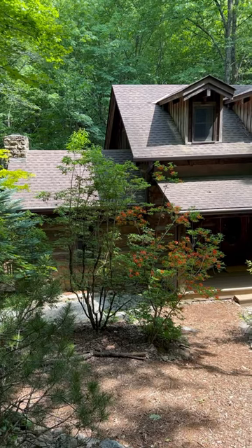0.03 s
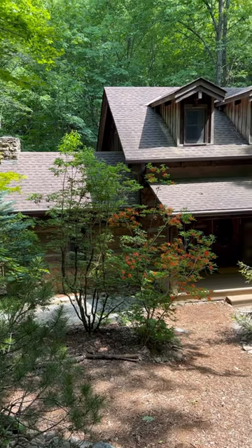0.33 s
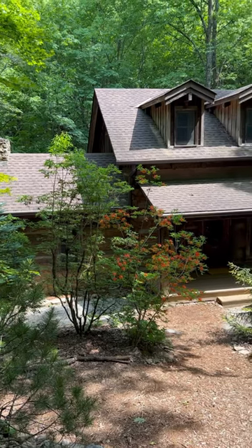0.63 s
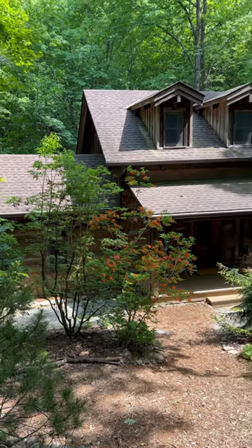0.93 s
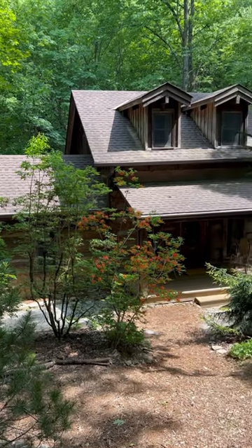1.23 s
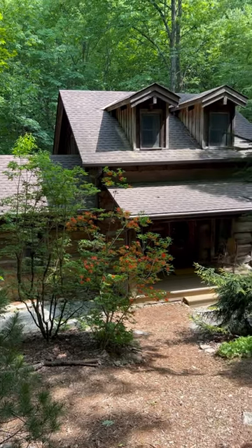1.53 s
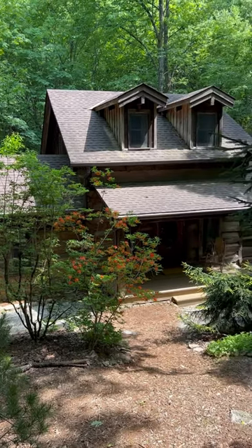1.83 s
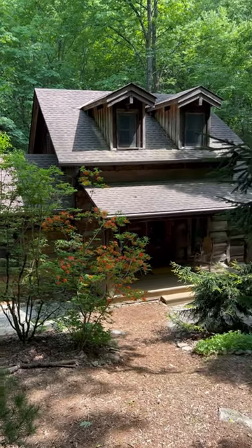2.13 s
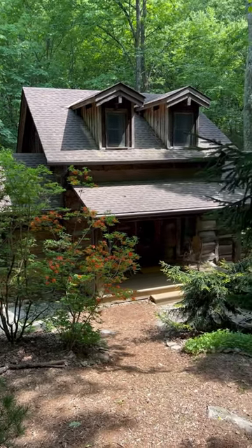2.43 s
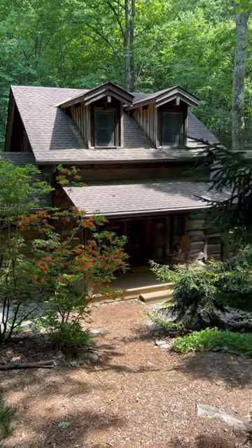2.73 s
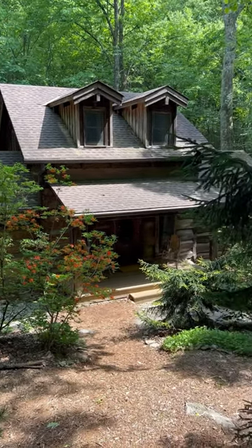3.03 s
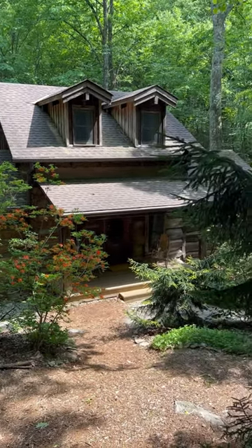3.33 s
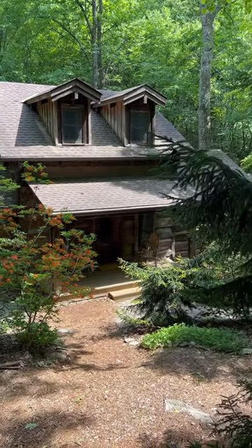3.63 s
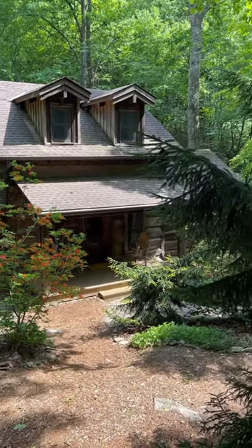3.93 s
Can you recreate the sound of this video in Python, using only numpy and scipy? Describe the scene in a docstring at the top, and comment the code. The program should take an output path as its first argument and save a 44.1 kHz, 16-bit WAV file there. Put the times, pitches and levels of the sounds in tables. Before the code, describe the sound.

Far-off running water fills a wooded clearing with a soft, even rush throughout. A bird gives a few faint, high chirps in the trees, while small gusts bump the microphone with low thuds through the middle and later part.

```python
"""A steady, wide hiss fills a forest clearing by a cabin, most likely a creek beyond the trees:
countless far splashes merging into one rush. Close up, light puffs of air thud and rumble on
the two-port microphone. Far off, a few short bird chirps barely rise out of the hiss."""
import sys
import numpy as np
from scipy import signal
from scipy.fft import rfft, irfft, next_fast_len
from scipy.io import wavfile
from scipy.ndimage import uniform_filter1d, map_coordinates

SR = 44100
rng = np.random.default_rng(int(sys.argv[2]) if len(sys.argv) > 2 else 0)


def file_out(sig):
    """Save sig as 16-bit WAV at sys.argv[1]."""
    # one column per channel
    cols = np.atleast_2d(sig).T
    # limit, then scale
    lim = np.clip(cols, -1, 1)
    pcm = np.round(lim * 32767).astype(np.int16)
    wavfile.write(sys.argv[1], SR, pcm)


N = 176400
TIME_S = np.arange(N) / SR


def amp(db):
    """Decibels to gain."""
    return 10 ** (np.asarray(db) / 20)


def unit_rms(x):
    """Scale to rms 1."""
    return x / np.sqrt(np.mean(x ** 2) + 1e-20)


def curve_at(table, hz, column=1):
    """One column of a table, interpolated on a log frequency axis."""
    columns = np.transpose(table)
    return np.interp(np.log(hz + 1), np.log(columns[0] + 1), columns[column])


def wobble(rate_hz):
    """A smooth random curve with rate_hz knots a second."""
    knots = rng.standard_normal(int(N * rate_hz / SR) + 4)
    return map_coordinates(knots, [TIME_S * rate_hz])


def filtered(x, response):
    """Multiply the spectrum of x by response(hz)."""
    size = next_fast_len(N + SR // 2)
    hz = np.fft.rfftfreq(size, 1 / SR)
    return irfft(rfft(x, size) * response(hz), size)[..., :N]


def bell(peak_s, length_s):
    """A bell-shaped rise and fall around peak_s."""
    return np.exp(-2 * ((TIME_S - peak_s) / length_s) ** 2)


# Bird chirps far off in the trees: peak_s, length_s, pitch_hz, blur_hz, level_db
BIRD_CHIRPS = [(.533, 0.044, 4330, 650, -59), (1.9, 0.033, 3570, 300, -57), (2.934, .021, 3830, 74.6, -53),
               (3.87, .035, 4600, 200, -68)]

def far_bird(rise_hz_per_s=600):
    """Short, slightly rising notes, some thin, some smeared on their way through the trees."""
    chirps = np.zeros(N)
    for peak_s, length_s, pitch_hz, blur_hz, level_db in BIRD_CHIRPS:
        glide_hz = pitch_hz + rise_hz_per_s * np.clip(TIME_S - peak_s, -length_s, length_s)
        phase = 2 * np.pi * np.cumsum(glide_hz) / SR
        note = wobble(2 * blur_hz) * np.sin(phase) + wobble(2 * blur_hz) * np.cos(phase)
        chirps += amp(level_db) * bell(peak_s, length_s) * unit_rms(note)
    return chirps


# Puffs of air right on the microphone: peak_s, length_s, pitch_hz, level_db
AIR_PUFFS = [(1.114, 0.016, 75.4, -44), (1.459, 0.024, 60, -42), (1.492, 0.023, 58, -44),
             (1.731, 0.017, 68, -42), (1.77, .022, 88.2, -34.5), (1.866, .03, 68.2, -41),
             (1.899, .017, 68, -37.5), (1.931, .018, 70, -45.5), (2.086, 0.069, 57.8, -49),
             (2.684, 0.029, 61.6, -48), (2.762, .05, 60, -51), (2.815, 0.022, 62, -41),
             (3.067, 0.016, 76, -41), (3.116, 0.022, 91, -42), (3.157, 0.021, 78.4, -39.5),
             (3.187, .028, 62.1, -44.5), (3.355, 0.053, 52, -53)]
# Spectrum of their turbulence: frequency_hz, relative_db
RUMBLE_SPECTRUM = [(20, -9), (40, 6), (62, 0.5), (90, -7.5), (130, -1.5), (200, -9.5), (330, -11.5),
                   (500, -26), (1000, -100)]

def air_on_microphone(sag_octaves=0.45, rumble_db=-7.5, side_db=-24):
    """Each eddy thuds on the microphone: a few low swings that slow down, roughened by turbulence."""
    thuds, strength = np.zeros(N), np.zeros(N)
    for peak_s, length_s, pitch_hz, level_db in AIR_PUFFS:
        progress = np.clip((TIME_S - peak_s) / length_s, -1, 1)
        falling_hz = pitch_hz * 2 ** (-sag_octaves * progress)
        phase = 2 * np.pi * (np.cumsum(falling_hz) / SR + rng.random())
        eddy = amp(level_db) * bell(peak_s, length_s)
        thuds += eddy * np.sqrt(2) * np.sin(phase)
        strength += eddy
    noise = rng.standard_normal((2, N))
    mid, side = unit_rms(filtered(noise, lambda hz: amp(curve_at(RUMBLE_SPECTRUM, hz))))
    side = amp(side_db) * side  # the small part that differs between the ports
    turbulence = np.array([mid + side, mid - side])
    return thuds + amp(rumble_db) * strength * turbulence


# Coherence of the microphone's two ports: frequency_hz, in_phase_part, quadrature_part
PORT_COHERENCE = [(100,0.99,0.012),(366,0.93,-0.16),(750,0.22,0.049),(1310,0.28,0.33),(1720,0.67,0.49),(2190,0,0.25),(2800,-0.31,0.056),(3440,0.0057,-0.063),(4080,0.44,-.26),(4930,-0.21,-0.35),(5560,0.93,0.071),(7360,1,-.02),(8430,0.72,-.5),(10000,0.012,-.52),(12570,-1.13,-0.012)]
# Balance between the ports: frequency_hz, left_minus_right_db
PORT_BALANCE = [(130,-0.5),(270,-1),(570,-4),(1220,-2),(2580,0.3),(5480,0)]

def at_microphone(noise_pair):
    """Mix two unrelated noises into the partly alike sound at the left and right ports."""
    def mixing(hz):
        coherence = curve_at(PORT_COHERENCE, hz) + 1j * curve_at(PORT_COHERENCE, hz, column=2)
        spread = np.arccos(np.clip(abs(coherence), 0, 1)) / 2
        shared, opposed = np.cos(spread), np.sin(spread)
        lean = amp(curve_at(PORT_BALANCE, hz) / 2)
        left, right = lean * np.exp(1j * np.angle(coherence)), 1 / lean
        return np.array([[left * shared, left * opposed], [right * shared, -right * opposed]])
    return filtered(noise_pair, mixing).sum(axis=1)


def patchy_noise(depth_db):
    """Two unrelated noises that share small patches of random gain."""
    spectra = signal.stft(rng.standard_normal((2, N)), nperseg=512)[2]
    patches = rng.standard_normal(spectra.shape[1:])
    patches = uniform_filter1d(patches, size=6, axis=0)  # across frequency
    patches = uniform_filter1d(patches, size=12, axis=1)  # across time
    return signal.istft(spectra * amp(depth_db * unit_rms(patches)), nperseg=512)[1][:, :N]


# Spectrum of the water, heard from the clearing: frequency_hz, relative_db
CREEK_SPECTRUM = [(20,-26),(35,-7),(60,-0.5),(90,-2),(125,0.5),(190,-5),(350,-6.5),(600,-6),(1000,-8),(1800,-12.5),(2600,-9.5),(4000,-16),(5500,-17.5),(6500,-20.5),(7800,-22),(10200,-33.5),(12100,-28.5),(14500,-38.5)]

def creek(level_db=-46.5, swell_db=0.23, flutter_db=0.3):
    """Countless splashes beyond the trees merge into an even, faintly patchy rush."""
    splashes = at_microphone(patchy_noise(depth_db=0.76))
    rush = filtered(splashes, lambda hz: amp(curve_at(CREEK_SPECTRUM, hz)))
    waver_db = swell_db * wobble(rate_hz=2.9) + flutter_db * wobble(rate_hz=25)
    return unit_rms(rush) * amp(level_db + waver_db)


def scene():
    """From the clearing: the creek spread wide, the close puffs and the far bird in the centre."""
    return creek() + air_on_microphone() + far_bird()


def record(dry, start_s=0.036, top_hz=14500):
    """A moment of silence before the sound begins; nothing passes above top_hz."""
    return filtered(dry * (TIME_S > start_s), lambda hz: hz < top_hz)


dry = scene()
out = record(dry)
file_out(out)
```